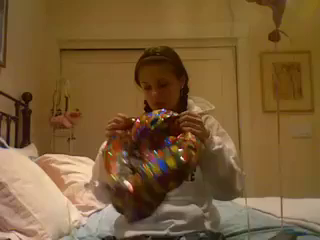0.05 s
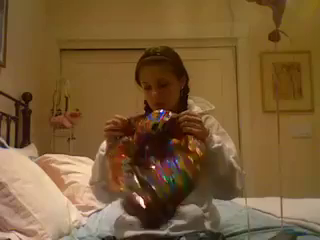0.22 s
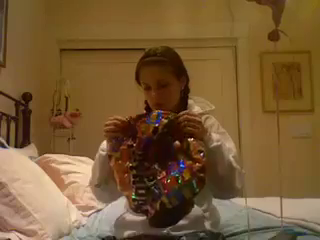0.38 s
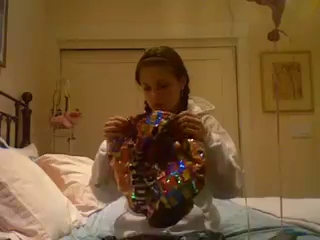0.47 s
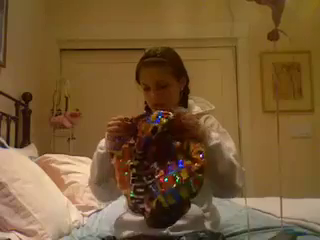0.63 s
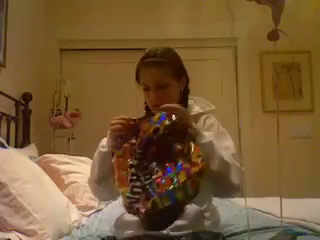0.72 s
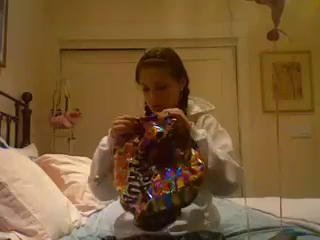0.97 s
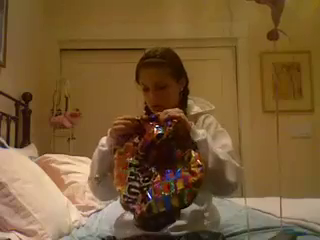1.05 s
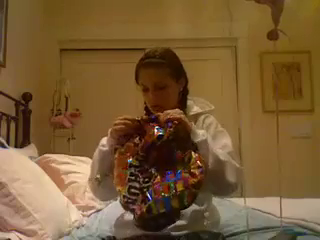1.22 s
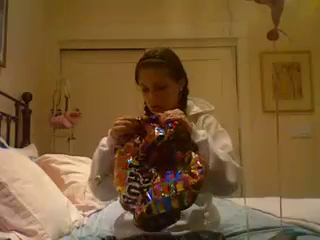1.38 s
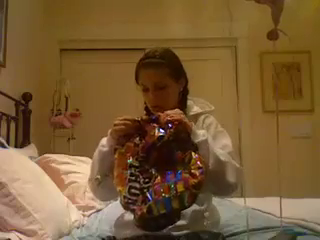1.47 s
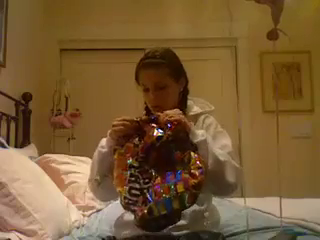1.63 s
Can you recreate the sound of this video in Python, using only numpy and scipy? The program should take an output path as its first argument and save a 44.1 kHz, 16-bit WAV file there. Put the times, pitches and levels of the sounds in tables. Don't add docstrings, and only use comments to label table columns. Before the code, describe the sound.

A limp foil balloon crinkles in hands, close and bright in a fairly dry bedroom. Light ticks open, then dense crackling with low air puffs bursts out at 0.25-0.5 s. Separate snaps follow, the sharpest near 0.76 s. After a lull from 0.87 s, another crinkle runs 1.03-1.23 s, then sparse faint ticks around 1.55 s. Soft hiss and a rapidly pulsing, thin high whine continue underneath.

```python
import sys
import numpy as np
from scipy import signal
from scipy.fft import rfft, irfft, next_fast_len
from scipy.io import wavfile
from scipy.ndimage import uniform_filter1d

SR = 44100
rng = np.random.default_rng(int(sys.argv[2]) if len(sys.argv) > 2 else 0)


def unload_wav(signal):
    wavfile.write(
        sys.argv[1],
        SR,
        np.round(np.clip(np.atleast_2d(signal).T, -1, 1) * 32767).astype(np.int16),
    )


def boost(x):
    u = np.asarray(x, float) / 20
    return 10 ** u


N = 74970

# frequency in Hz, level in dB per Hz.
HISS_SPECTRUM = [(40, -33), (90, -13.5), (160, 3), (420, -5), (1500, -12), (7000, -23), (12000, -40),
                 (16000, -41)]
HISS_DB = -70
# frequency in Hz, peak in dB.
STEADY_LINES = [(12225, -87), (12285, -86), (15250, -87)]
WHINE_HZ, WHINE_START_S, WHINE_EVERY_S, WHINE_ON_S = 8000.2, 0.0255, 0.058375, 0.032
WHINE_DB, WHINE_RISE_S, WHINE_WOBBLE_DB = -55.5, 0.003, 1.8
SAG_ABOVE_DB, SAG_SHARE, SAG_MOST_DB, SAG_RECOVERS_DB_PER_S = -49.0, 1.0, 8.0, 22.0

ROOM_T60_S, ROOM_DB, WALL_CUT_HZ = 0.24, -23.0, 7000

# time in seconds, level of the small folds in dB, brightness in dB per octave.
HAND_PRESSURE = [(0.005, -51, -0.5), (.05, -72.5, -5), (0.221, -67, -5), (0.267, -33.5, -1.5),
                 (.345, -38, -2), (.415, -47.5, -5), (.46, -41, 1.5), (.56, -54.5, -0.5),
                 (0.639, -54, -0.8), (0.738, -40, -4.5), (0.771, -36, 3), (0.809, -46, -3),
                 (0.889, -61.5, -3.5), (1.027, -73.5, -8.5), (1.037, -42.5, -1.5), (1.165, -42.5, -2.5),
                 (1.33, -73, -4.5), (1.7, -71.5, -7)]
POCKET_LOW_HZ, POCKET_HIGH_HZ, POCKET_DB = 142, 1390, -60.5
POCKET_FOLLOWS = 0.43

# start in seconds, level in dB, pitch in Hz, length in seconds.
AIR_PUFFS = [(0.275, -34.5, 627, 0.0084), (0.288, -49, 617, 0.058), (0.302, -47.5, 377, 0.011),
             (0.323, -40, 218, 0.015), (0.334, -53, 240, 0.026), (0.453, -69, 243, 0.123),
             (0.694, -56, 556, 0.052), (0.753, -44.5, 590, 0.03), (0.763, -47.5, 313, 0.025),
             (0.286, -48.5, 1610, 0.049), (1.113, -56.5, 686, 0.055), (1.659, -61.5, 485, 0.029)]
PUFF_RISE_S = 0.0036

# start in seconds, peak in dB, pitch in Hz.
TAUT_PINGS = [(.003, -40, 4960), (.003, -38.5, 5520), (.0232, -50, 8460), (.0232, -62, 10900),
              (.0232, -69, 13000), (0.0898, -51.5, 2770), (0.0935, -47, 3420), (0.092, -52.5, 9400),
              (0.163, -59, 5600), (0.1633, -65, 3280), (0.5762, -39, 2230), (.666, -33, 2800),
              (.7571, -25.5, 9030), (1.227, -41.5, 8800), (1.457, -66, 2470), (1.488, -68, 3180),
              (1.5183, -59, 6000), (1.541, -49, 5290), (1.5397, -50, 6750), (1.5403, -45, 8280),
              (1.575, -47.5, 4180), (1.5729, -44, 5000), (1.5745, -48, 5610), (1.5737, -44, 7100),
              (1.5737, -43, 8580), (1.574, -51, 9340), (1.574, -51, 10980), (1.5737, -54, 6100),
              (1.573, -58, 13200), (0.296, -41, 1550), (1.615, -61, 6800)]
PING_RISE_S, PING_T60_S, PING_LINGERS_S, PING_LINGER_DB = 0.0008, 0.012, 0.07, -17.0

# start in seconds, peak in dB, centre in Hz.
SHEET_JUMPS = [(0.0051, -31, 4970), (0.2485, -22, 3250), (0.2718, -17, 5900), (0.2776, -20, 4850),
               (0.2834, -18, 5290), (0.3023, -21, 4290), (0.3076, -22, 4250), (0.3208, -20, 6980),
               (0.3274, -18, 5520), (0.3616, -25, 5040), (0.4077, -27, 5990), (0.4193, -30, 3310),
               (0.4351, -28, 5440), (0.4413, -24, 5450), (0.4472, -26, 6300), (0.451, -24, 7480),
               (0.4638, -22, 5290), (0.4854, -17, 4600), (0.4876, -23, 7080), (0.5137, -23, 5310),
               (0.5472, -30, 5980), (0.6148, -31, 5320), (0.6387, -24, 4510), (0.659, -31, 7320),
               (0.7118, -24, 3450), (0.7571, -10, 7200), (0.7684, -11, 5920), (0.8476, -32, 4460),
               (1.0291, -26, 3370), (1.0362, -18, 5940), (1.0496, -23, 4180), (1.0667, -23, 6100),
               (1.083, -30, 3420), (1.0944, -20, 6540), (1.1141, -29, 3360), (1.1279, -26, 4150),
               (1.1459, -25, 4610), (1.1559, -24, 5910), (1.243, -39, 7030), (1.5413, -35, 7390)]
JUMP_CYCLES, JUMP_DB, JUMP_TAIL_S, JUMP_TAIL_DB = 2.6, -3.5, 0.001, -12.0

# start in seconds, large facet level in dB, large facet pitch
# in Hz, small facet level in dB, small facet pitch in Hz.
CREASE_SNAPS = [(0.0029, -30, 3180, -29, 7350), (0.0912, -48, 3500, -44.5, 6190),
                (0.1855, -45, 4760, -55, 4640), (0.189, -61, 4390, -52, 5230),
                (0.2246, -44, 2000, -42, 6500), (0.2484, -24, 2740, -23, 5300),
                (0.2563, -42, 3900, -33, 8250), (0.2683, -21.5, 2800, -32, 6900),
                (0.2717, -27, 2900, -28, 4500), (0.2831, -48, 1620, -35, 4700),
                (0.2976, -25.5, 1700, -26, 7300), (0.3228, -25, 2500, -24, 6250),
                (0.3271, -32, 2400, -21, 4440), (0.338, -39, 4390, -22, 5440),
                (0.3467, -43, 4070, -23, 6870), (0.3635, -23, 2620, -25.5, 8900),
                (0.3745, -28.5, 1860, -29, 9000), (0.4003, -21.5, 2580, -30, 7140),
                (0.4075, -38, 3580, -28.5, 6950), (0.4348, -36, 2000, -40, 7020),
                (0.441, -32, 1970, -29, 6250), (0.4551, -23, 2660, -23, 8900),
                (0.4636, -52, 2920, -28, 5370),
                (0.4661, -22.5, 2620, -27.5, 6780), (0.4846, -19, 2500, -33, 6700),
                (0.4917, -24.5, 4350, -21.5, 5300), (0.512, -25, 3900, -42, 5460),
                (0.547, -48, 2560, -41, 6760), (0.556, -45, 3450, -32.5, 5560),
                (0.5635, -38, 3760, -44, 8900), (0.5771, -29, 4700, -20, 7540),
                (0.5831, -35.5, 2800, -24.5, 6640), (0.59, -37, 4250, -19, 8930),
                (0.6148, -34, 4220, -45, 4530), (0.6203, -47, 4010, -45, 4660),
                (0.638, -27.5, 2720, -29.5, 7200), (0.6524, -45, 4350, -20, 7050),
                (0.666, -27.5, 1950, -15.5, 6850), (0.699, -27, 3900, -24.5, 7330),
                (0.7112, -27.5, 2500, -27, 4430), (0.7417, -40, 3800, -36, 6950),
                (0.756, -17, 4250, -17, 6430), (0.768, -21, 2970, -41, 7900),
                (0.822, -68, 3830, -28.5, 4340), (0.8466, -32.5, 3780, -34.5, 5370),
                (0.8563, -38, 3390, -34, 4600),
                (0.9331, -48, 4320, -58, 5400), (0.9444, -60, 4240, -49.5, 4770),
              (0.9554, -51, 2900, -47.5, 5000), (0.9904, -57, 2150, -50.5, 5100),
              (1.0287, -29.5, 2120, -30, 7000), (1.036, -29.5, 2160, -22.5, 5500),
              (1.0487, -27.5, 2970, -29, 6400), (1.055, -28, 2760, -36, 5640),
              (1.0663, -40, 4350, -27.5, 6360), (1.0939, -24.5, 4240, -26.5, 9200),
              (1.1186, -25.5, 2760, -35, 4400), (1.127, -29, 2700, -42, 9500),
              (1.1396, -25.5, 2720, -32, 9450), (1.145, -30, 2480, -31, 9400),
              (1.1561, -30, 3050, -27.5, 5930), (1.1944, -33.5, 1890, -35, 4700),
              (1.2255, -34, 5000, -30.5, 10900), (1.278, -61, 4280, -40, 8400),
              (1.3052, -47.5, 2490, -54, 8900), (1.5413, -52, 4440, -52, 13100),
              (1.5735, -54, 2290, -33, 7500), (1.58, -40, 4930, -41, 6860),
              (1.661, -52.5, 1720, -50.5, 8700)]
SNAP_BURST_S, SNAP_RISE_S, SNAP_TAIL_S, SNAP_TAIL_DB = 0.0006, 0.0001, 0.006, -17.0
SNAP_CYCLES, SNAP_RING_DB, SNAP_CRACK_DB = 8.0, -4.5, -5.0
SNAP_LINGERS_S, SNAP_LINGER_DB = 0.022, -23.0

# frequency in Hz, level in dB per Hz.
FOIL_SPECTRUM = [(1450, -13.5), (1850, -1), (2700, -1.5), (4500, 1), (6800, 0), (9500, 0), (13000, -9),
                 (15500, -22)]
FOLDS_PER_S, FOLD_SPREAD_DB, FOLD_CYCLES, FOLD_CLUMP_DB, FOLDS_DB = 13000, 2.5, 17.0, 2.0, 1.0
FOIL_LOWEST_HZ = 1420

TOP_CUT_HZ, LEAK_CUT_HZ, LEAK_DB = 15640, 16600, -13


def rms_one(x):
    return x / np.sqrt(np.mean(x ** 2) + 1e-20)


def at_hz(points, hz):
    points = np.array(points)
    return np.interp(np.log(hz), np.log(points[:, 0]), points[:, 1])


def drift(rate):
    r = np.exp(-2 * np.pi * rate / SR)
    noise = rng.standard_normal(N + 9000)
    return rms_one(signal.lfilter([1], [1, -2 * r, r * r], noise)[9000:])


def ring(clicks, hz, t60):
    r, w = boost(-60 / (t60 * SR)), 2 * np.pi * hz / SR
    gain = np.sqrt(1 - r * r)
    return signal.lfilter([gain, 0, -gain], [1, -2 * r * np.cos(w), r * r], clicks + 1e-18)


def colour(x, spectrum):
    hz = np.maximum(np.fft.rfftfreq(len(x), 1 / SR), 1)
    return irfft(rfft(x) * boost(at_hz(spectrum, hz)), len(x))


def high_pass(x, order, hz):
    return signal.sosfilt(signal.butter(order, hz, "high", fs=SR, output="sos"), x)


def hiss_and_lines():
    t = np.arange(N) / SR
    lines = sum(boost(db + 2 * drift(50)) * np.sin(2 * np.pi * hz * t) for hz, db in STEADY_LINES)
    return lines + boost(HISS_DB) * rms_one(colour(rng.standard_normal(N), HISS_SPECTRUM))


def pulsed_whine():
    t = np.arange(N) / SR
    since = (t - WHINE_START_S) % WHINE_EVERY_S
    gate = np.clip(since / 0.0012, 0, 1) * np.clip((WHINE_ON_S - since) / 0.0015, 0, 1)
    gate = gate * (1 - 0.7 * np.exp(-since / WHINE_RISE_S))
    return boost(WHINE_DB + WHINE_WOBBLE_DB * drift(40)) * gate * np.sin(2 * np.pi * WHINE_HZ * t)


def sag(x):
    level_db = 10 * np.log10(uniform_filter1d(x ** 2, size=2048, mode="constant") + 1e-12)
    climb = SAG_RECOVERS_DB_PER_S * np.arange(N) / SR
    drop_db = np.clip(SAG_SHARE * (level_db - SAG_ABOVE_DB), 0, SAG_MOST_DB)
    return boost(climb - np.maximum.accumulate(drop_db + climb))


def bedroom(x):
    size = next_fast_len(N + SR)
    hz = np.fft.rfftfreq(size, 1 / SR)
    response = 0
    for k, lag in enumerate(rng.uniform(0.0064, 0.03, 10)):
        absorbed = 1 + 1j * hz / WALL_CUT_HZ * lag / 0.065
        loop = boost(-60 * lag / ROOM_T60_S) / absorbed * np.exp(-2j * np.pi * hz * lag)
        response = response + (-1) ** k * loop / (1 - loop)
    return boost(ROOM_DB) * irfft(rfft(x, size) * response, size)[:N]


def hand_pressure():
    s, level_db, tilt_db = np.transpose(HAND_PRESSURE)
    t = np.arange(N) / SR
    return np.interp(t, s, level_db), np.interp(t, s, tilt_db)


def pocket_rumble():
    level_db, _ = hand_pressure()
    band = signal.butter(2, [POCKET_LOW_HZ, POCKET_HIGH_HZ], "band", fs=SR, output="sos")
    rumble = rms_one(signal.sosfilt(band, rng.standard_normal(N)))
    return boost(POCKET_DB + POCKET_FOLLOWS * (level_db + 44)) * rumble


def puffs():
    out, t = np.zeros(N), np.arange(N) / SR
    for s, level_db, hz, length in AIR_PUFFS:
        shape = np.clip((t - s) / PUFF_RISE_S, 0, 1) * np.exp(-(np.maximum(t - s, 0) / length) ** 2)
        breath = ring(ring(rng.standard_normal(N), hz, 4.2 / hz), hz, 3.2 / hz)
        out += boost(level_db) * shape * rms_one(breath)
    return high_pass(out, 4, POCKET_LOW_HZ)


def pings():
    out, t = np.zeros(N + SR), np.arange(4096) / SR
    for s, db, hz in TAUT_PINGS:
        noise = rng.standard_normal(len(t))
        envelope = (1 - np.exp(-t / PING_RISE_S)) * boost(-60 * t / PING_T60_S)
        main = envelope * np.sin(2 * np.pi * hz * t + 2 * noise[0])
        trace = boost(PING_LINGER_DB - 60 * t / PING_LINGERS_S) * rms_one(ring(noise, hz, PING_T60_S * 2))
        i = int(s * SR)
        out[i:i + len(t)] += boost(db) * (main / np.abs(main).max() + trace)
    return out[:N]


def jumps():
    out, t = np.zeros(N + SR), np.arange(256) / SR
    soft = signal.butter(2, 11000, fs=SR, output="sos")
    for s, db, hz in SHEET_JUMPS:
        noise = rng.standard_normal(len(t))
        step = np.sign(noise[0]) * (t == 0)
        wisp = boost(JUMP_TAIL_DB) * noise * np.exp(-t / JUMP_TAIL_S)
        click = signal.sosfilt(soft, ring(step + wisp, hz, JUMP_CYCLES / hz))
        i = int(s * SR)
        out[i:i + len(t)] += boost(db + JUMP_DB) * click / np.abs(click).max()
    return out[:N]


def snaps():
    out, t = np.zeros(N + SR), np.arange(2048) / SR
    broad = signal.butter(1, [2500, 12000], "band", fs=SR, output="sos")
    decay = np.exp(-t / SNAP_BURST_S) + boost(SNAP_TAIL_DB) * np.exp(-t / SNAP_TAIL_S)
    envelope = (1 - np.exp(-t / SNAP_RISE_S)) * decay
    for s, large_db, large_hz, small_db, small_hz in CREASE_SNAPS:
        burst = rng.standard_normal(len(t)) * envelope
        parts = [(signal.sosfilt(broad, burst), small_db + SNAP_CRACK_DB)]
        for db, hz in (large_db, large_hz), (small_db, small_hz):
            rung = ring(ring(burst, hz, SNAP_CYCLES / hz), hz, SNAP_CYCLES / hz / 2)
            parts.append((rung, db + SNAP_RING_DB))
            parts.append((ring(rung, hz, SNAP_LINGERS_S), db + SNAP_LINGER_DB))
        i = int(s * SR)
        out[i:i + len(t)] += sum(boost(db) * part / np.abs(part).max() for part, db in parts)
    return out[:N]


def folds():
    level_db, tilt_db = hand_pressure()
    sizes = boost(FOLD_SPREAD_DB * np.minimum(rng.exponential(1, N), 4)) * rng.choice([-1, 1], N)
    born = rng.random(N) < FOLDS_PER_S * boost(FOLD_CLUMP_DB * drift(60)) / SR
    facet = rng.integers(0, 30, N)
    out = np.zeros(N)
    for k, hz in enumerate(np.geomspace(1500, 15500, num=30)):
        clicks = sizes * born * (facet == k)
        rung = ring(ring(clicks, hz, FOLD_CYCLES / hz), hz, FOLD_CYCLES / hz / 2)
        out += rung * hz * boost(at_hz(FOIL_SPECTRUM, hz) + tilt_db * np.log2(hz / 4000))
    return boost(level_db + FOLDS_DB) * rms_one(out)


def scene():
    foil = high_pass(folds() + snaps() + jumps() + pings(), 5, FOIL_LOWEST_HZ)
    balloon = foil + pocket_rumble() + puffs()
    whine = pulsed_whine() * sag(balloon)
    room = bedroom(balloon + boost(-1.0) * whine)
    return (balloon + room + whine + hiss_and_lines())[None]


def band_limit(x):
    return signal.sosfilt(signal.butter(12, 16470, fs=SR, output="sos"), x)


def record(dry):
    cut = signal.sosfiltfilt(signal.cheby2(10, 30, TOP_CUT_HZ, fs=SR, output="sos"), dry)
    leak = signal.sosfiltfilt(signal.cheby2(10, 40, LEAK_CUT_HZ, fs=SR, output="sos"), dry - cut)
    return band_limit(cut + boost(LEAK_DB) * leak)


dry = scene()
out = record(dry)
unload_wav(out)
```